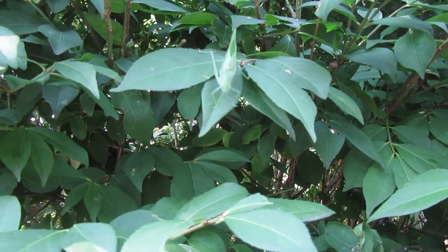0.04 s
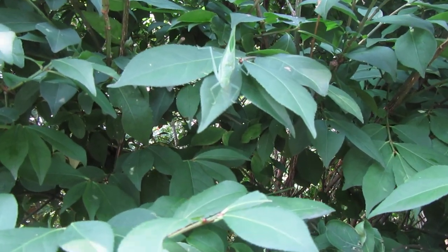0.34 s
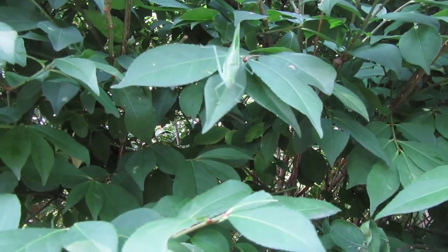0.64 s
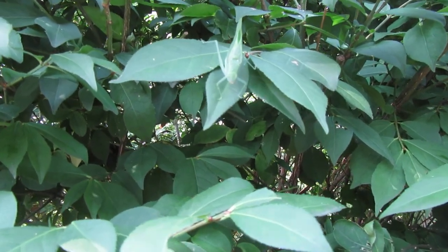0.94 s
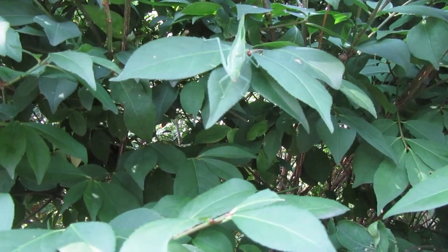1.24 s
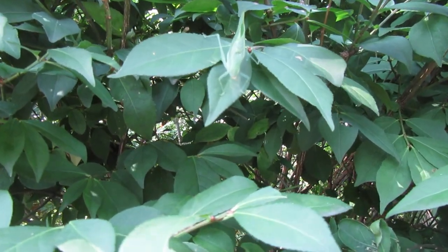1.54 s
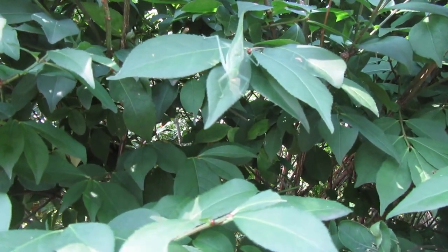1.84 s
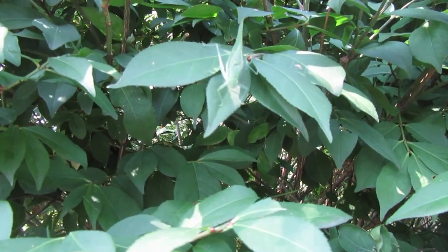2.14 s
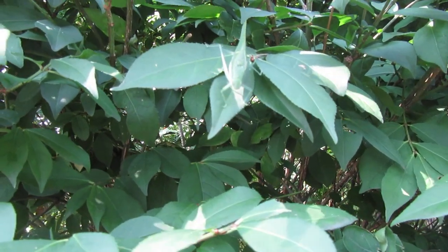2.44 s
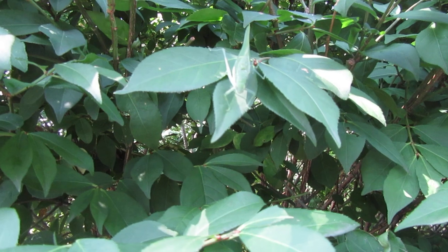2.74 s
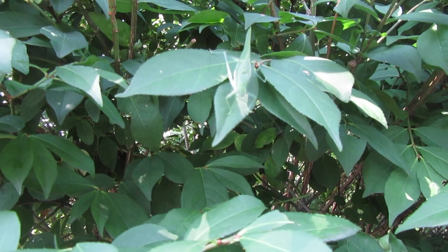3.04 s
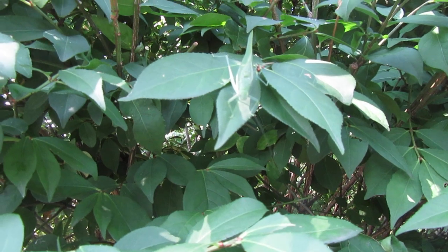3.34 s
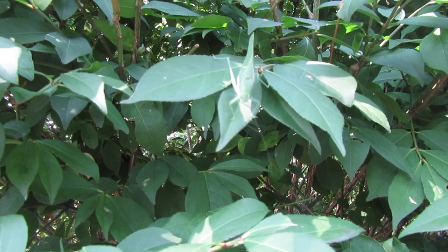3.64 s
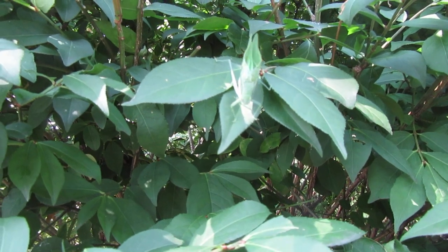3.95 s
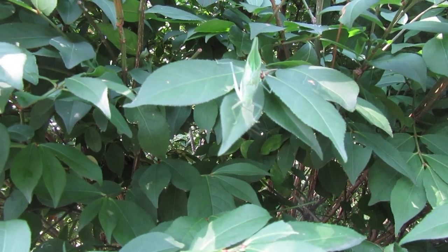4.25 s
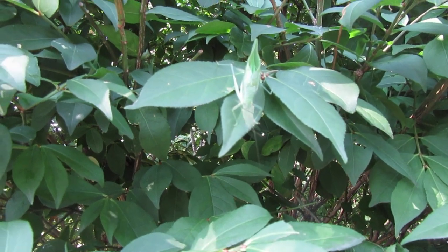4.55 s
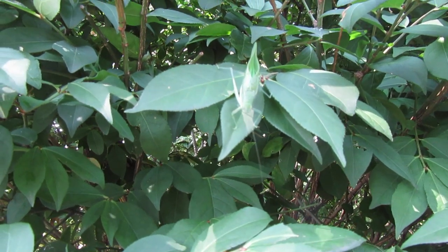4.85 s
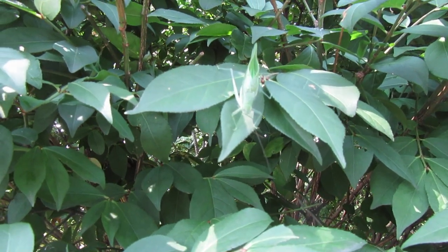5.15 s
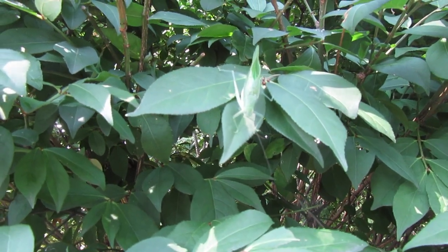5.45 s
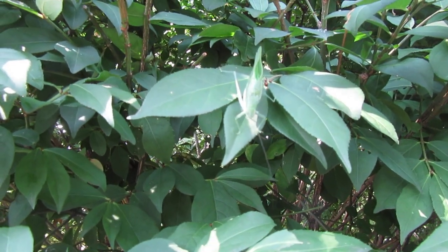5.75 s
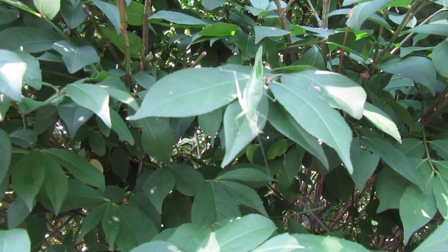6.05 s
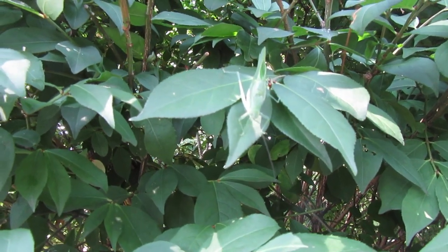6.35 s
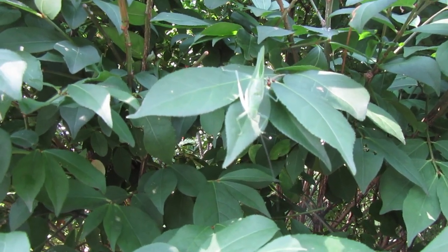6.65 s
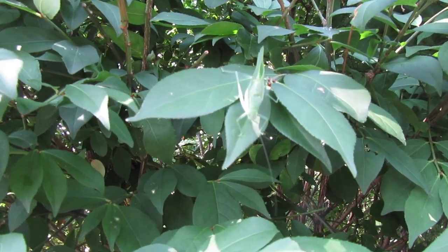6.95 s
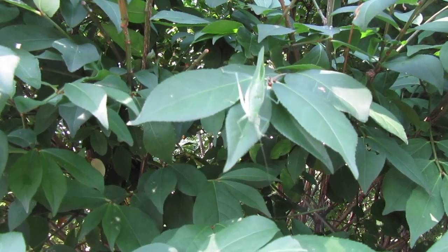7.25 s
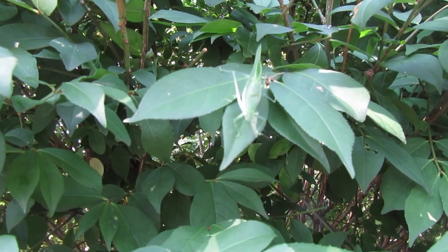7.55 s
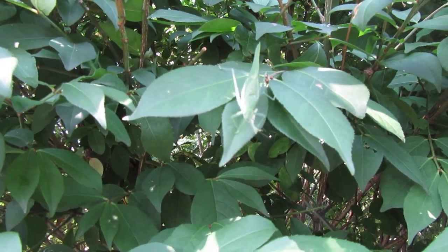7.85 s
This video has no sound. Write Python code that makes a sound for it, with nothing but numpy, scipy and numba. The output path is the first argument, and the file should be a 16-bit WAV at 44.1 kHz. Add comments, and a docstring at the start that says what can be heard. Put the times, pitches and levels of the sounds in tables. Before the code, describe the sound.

A katydid in a leafy shrub makes sharp, very high ticks, about nine a second, close to a handheld microphone. A short run eases off and stops, leaving about three seconds of faint hiss that slowly rises. A second, longer run starts softly, grows louder and then ends. A thin, faint camera whine lies underneath, with two soft handling bumps late on.

```python
"""A katydid in a shrub ticks in two runs, about nine ticks a second, close to a handheld camera.
Each tick is one tooth of the wing file ringing the wing; nearby leaves, the ground and the shrub echo it.
Underneath: steady hiss, camera whine, two hand bumps, two faint clicks and a brief far tone.
The camera's gain creeps up in the pause, lifting hiss and whine, and ducks when the ticks return."""
import sys
import numpy as np
from scipy import signal
from scipy.fft import rfft, irfft
from scipy.io import wavfile
from numba import njit

SR = 44100
rng = np.random.default_rng(int(sys.argv[2]) if len(sys.argv) > 2 else 0)


def generate_wav(sig):
    """Save sig (samples, or channels by samples) to the path in sys.argv[1] as 16-bit PCM at SR."""
    pcm = np.round(np.clip(np.atleast_2d(sig).T, -1, 1) * 32767).astype(np.int16)
    wavfile.write(sys.argv[1], SR, pcm)


N = 348390
FFT_SIZE = 16384
RUN_SPLIT_S = 2.5  # in the pause between the runs


def undb(db):
    """Decibels to gain."""
    return 10 ** (np.asarray(db) / 20)


def unit_energy(x):
    """Scale a short sound to energy 1."""
    return x / np.sqrt(np.sum(x ** 2))


def bin_gains(spectrum, size):
    """Gain of a (Hz, dB) spectrum at each FFT bin."""
    hz, db = np.transpose(spectrum)
    bin_hz = np.fft.rfftfreq(size, 1 / SR)
    return undb(np.interp(np.log(bin_hz + 1), np.log(hz), db))


def noise(spectrum, size):
    """Coloured noise of rms 1."""
    x = irfft(rfft(rng.standard_normal(size)) * bin_gains(spectrum, size), size)
    return x / x.std()


def ring(spectrum):
    """Minimum-phase response of a body with this spectrum to one sharp blow."""
    cepstrum = irfft(np.log(bin_gains(spectrum, FFT_SIZE)))
    cepstrum[1:FFT_SIZE // 2] *= 2
    cepstrum[FFT_SIZE // 2 + 1:] = 0
    return unit_energy(irfft(np.exp(rfft(cepstrum))))


def drift(rate_hz):
    """Slow random drift with a spread near 1."""
    knots = rng.standard_normal(int(N / SR * rate_hz) + 2)
    return np.interp(np.arange(N) / SR * rate_hz, np.arange(len(knots)), knots)


def add(out, start_s, sound):
    """Mix a sound in at start_s."""
    start = max(int(round(start_s * SR)), 0)
    part = sound[:max(N - start, 0)]
    out[start:start + len(part)] += part


# Hiss spectrum. Each row: frequency in Hz, relative density in dB.
HISS_SPECTRUM = [(20, -5.5), (45, -2.5), (130, 0), (220, -3), (300, -2), (400, -4), (530, -1), (800, -5.5),
                 (1500, -9.5), (3000, -12.5), (5500, -16.5), (7500, -19.5), (10000, -25.5), (14800, -36),
                 (15600, -53.5)]


def hiss(rms_db=-57):
    """Steady hiss, cut off steeply above about 15 kHz."""
    return noise(HISS_SPECTRUM, N) * undb(rms_db)


# Camera hum and whine. Each row: frequency in Hz, rms level in dB.
WHINE_TONES = [(97, -76), (1926, -77.5), (3501, -86.5), (3617, -85), (3676, -80.5), (7350, -86.5)]


def camera_whine(wobble_hz=3, flicker_db=1.5):
    """Thin, slightly unsteady tones from inside the camera."""
    out = np.zeros(N)
    for hz, db in WHINE_TONES:
        phase = 2 * np.pi * np.cumsum(hz + wobble_hz * drift(rate_hz=25)) / SR
        amplitude = np.sqrt(2) * undb(db + flicker_db * drift(rate_hz=5))
        out += amplitude * np.sin(phase)
    return out


# Distant tone. One row: start in seconds, length in seconds, pitch in Hz, peak level in dB.
DISTANT_TONE = (6, .24, 299, -64.5)


def far_tone():
    """A soft, low tone swells out of the hiss and sinks back."""
    start_s, length_s, hz, db = DISTANT_TONE
    age_s = np.arange(N) / SR - start_s
    swell = np.sin(np.pi * np.clip(age_s / length_s, 0, 1))
    return undb(db) * swell * np.sin(2 * np.pi * hz * age_s)


# Handling noise. Each row: start in seconds, length in seconds, rms level at the crest in dB.
HAND_BUMPS = [(5.92, 0.22, -56), (7.15, 0.13, -62)]


def hand_bumps():
    """The hand shifts on the camera body: short, fading rumbles."""
    out, t = np.zeros(N), np.arange(FFT_SIZE) / SR
    spectrum_hz_db = [(12, -12), (30, 1), (70, -4), (160, -19), (500, -56), (2000, -92)]
    for start_s, length_s, db in HAND_BUMPS:
        envelope = np.sin(np.pi * np.sqrt(np.minimum(t / length_s, 1)))
        add(out, start_s, undb(db) * envelope * noise(spectrum_hz_db, FFT_SIZE))
    return out


# Faint clicks. Each row: start in seconds, energy in dB.
FAINT_CLICKS = [(1.702, -25.5), (7.702, -28)]


def clicks(t60_s=0.0096):
    """Tiny dry clicks, far weaker than the ticks."""
    out, t = np.zeros(N), np.arange(FFT_SIZE) / SR
    spectrum_hz_db = [(3000, -18), (6500, -2), (9000, 3), (11500, -8), (15000, -23)]
    decay = undb(-60 * t / t60_s)
    for start_s, db in FAINT_CLICKS:
        burst = noise(spectrum_hz_db, FFT_SIZE) * decay
        add(out, start_s, undb(db) * unit_energy(burst))
    return out


# Echo clouds of twigs, ground and whole shrub. Each row: delay, rise and T60 in seconds,
# energy in dB before the foliage colours it.
ECHO_CLOUDS = [(.0024, .0004, .02, -15), (.0085, .002, .035, -21.5), (.014, .006, .14, -30.5)]
# Foliage colouring. Each row: frequency in Hz, gain in dB.
FOLIAGE_SPECTRUM = [(5000, -7), (6900, -5.5), (7500, -2), (8400, 1), (9400, -4), (12000, 1), (15000, -3.5)]


def shrub_echoes():
    """Frequency response of the diffuse echoes: each cloud swells after its delay and dies away."""
    echoes, t = np.zeros(FFT_SIZE), np.arange(FFT_SIZE) / SR
    for delay_s, rise_s, t60_s, db in ECHO_CLOUDS:
        age_s = np.maximum(t - delay_s, 0)
        envelope = (1 - np.exp(-age_s / rise_s)) * undb(-60 * age_s / t60_s)
        echoes += undb(db) * unit_energy(envelope * rng.standard_normal(FFT_SIZE))
    return rfft(echoes) * bin_gains(FOLIAGE_SPECTRUM, FFT_SIZE)


# Leaf echoes per run; the camera shifts between runs. Each row: delay in ms, gain in dB.
FIRST_RUN_LEAVES = [(0.291, -17), (0.388, -13), (0.771, -11), (1.253, -19.5), (1.468, -13), (1.925, -19),
                    (2.109, -18), (2.497, -17.5)]
SECOND_RUN_LEAVES = [(0.312, -26.5), (0.76, -16), (1.02, -16.5), (1.491, -13.5), (1.701, -24.5),
                     (1.842, -15), (2.134, -15), (2.594, -21.5)]


def leaf_echoes(run, sway_ms=0.0027, turn_db=2.3):
    """Frequency response of the nearest leaves, which sway and turn a little from tick to tick."""
    delay_ms, echo_db = np.transpose((FIRST_RUN_LEAVES, SECOND_RUN_LEAVES)[run])
    sway, turn = rng.standard_normal((2, len(delay_ms)))
    bin_khz = np.fft.rfftfreq(FFT_SIZE, 1 / SR) / 1000
    paths = np.exp(-2j * np.pi * np.outer(bin_khz, delay_ms + sway_ms * sway))
    return paths @ undb(echo_db + turn_db * turn)


# Slow wing closures, one per run; the first is already under way.
# Each row: start in seconds, tick energy at full pressure in dB, pitch climb in Hz.
WING_STROKES = [(-1.7, 5.5, 270), (4, 6.3, 490)]


def wing_stroke(run, tick_s, length_s=2.68):
    """Tick energy and pitch: scraper pressure builds, holds and eases; pitch climbs along the file."""
    first_touch, attack_s, release_s, release_db_per_s = 0.055, 0.62, 0.79, 2.6
    base_hz, climb_exponent, tooth_scatter_hz = 9130, 1.5, 25
    start_s, full_db, climb_hz = WING_STROKES[run]
    age_s = max(tick_s - start_s, 0)
    pressure = 1 - (1 - first_touch) * np.exp(-age_s / attack_s)
    easing_db = release_db_per_s * max(age_s - (length_s - release_s), 0)
    energy_db = full_db + 20 * np.log10(pressure) - easing_db
    pitch_hz = base_hz + climb_hz * (age_s / length_s) ** climb_exponent
    return energy_db, pitch_hz + tooth_scatter_hz * rng.standard_normal()


# Tick spectrum at the reference pitch: a bright ring near 9.4 kHz over a faint low click.
# Each row: frequency in Hz, relative level in dB.
TICK_SPECTRUM = [(300, -36), (1500, -32), (3000, -41.5), (4800, -27), (5700, -26.5), (6600, -12),
                 (8000, -3.5), (9400, 0), (10800, -5), (12000, -16), (13300, -13), (14500, -26),
                 (15300, -45), (16500, -52)]
# Tooth strikes. Each entry: start in seconds.
TICK_TIMES_S = [.0379, .1478, 0.2642, 0.3603, .473, .5777, .682, 0.7874, .8905, 4.052, 4.2613, 4.359, 4.458,
                4.5698, 4.6749, 4.7849, 4.8949, 5.003, 5.1297, 5.256, 5.3688, 5.487, 5.6004, 5.7206, 5.8177,
                5.9269, 6.039, 6.1417, 6.251, 6.3402, 6.4562, 6.5593, 6.667, 6.7874]


def katydid(reference_hz=9317):
    """Each file tooth the scraper catches rings the wing briefly; leaves and shrub echo the tick."""
    out = np.zeros(N)
    for tick_s in TICK_TIMES_S:
        run = 0 if tick_s < RUN_SPLIT_S else 1
        energy_db, pitch_hz = wing_stroke(run, tick_s)
        direct = ring([(hz * pitch_hz / reference_hz, db) for hz, db in TICK_SPECTRUM])
        response = 1 + leaf_echoes(run) + shrub_echoes()
        tick = irfft(rfft(direct) * response)
        add(out, tick_s, undb(energy_db) * unit_energy(tick))
    return out


def scene():
    """The katydid over its quiet surroundings, in mono."""
    return (katydid() + clicks() + hand_bumps() + far_tone() + hiss() + camera_whine())[None]


@njit
def gain_control(x, rise_db_per_s, duck_db, threshold, lag_s):
    """Gain climbs; each output sample above threshold ducks it by duck_db times its squared overshoot."""
    out, target_db, gain_db = np.empty(len(x)), 0., 0.
    for i in range(len(x)):
        out[i] = min(max(x[i] * 10 ** (gain_db / 20), -1.), 1.)
        overshoot = max(abs(out[i]) - threshold, 0.)
        target_db += rise_db_per_s / SR - duck_db * overshoot ** 2
        gain_db += (target_db - gain_db) / (lag_s * SR)
    return out


def record(dry, cutoff_hz=16200):
    """The camera rides its gain, clips at full scale and cuts the top."""
    ridden = gain_control(dry[0], rise_db_per_s=4.4, duck_db=3.4, threshold=0.41, lag_s=0.0041)
    lowpass = signal.firwin(101, cutoff_hz, fs=SR)
    return signal.convolve(ridden, lowpass, mode="same")[None]


dry = scene()
out = record(dry)
generate_wav(out)
```